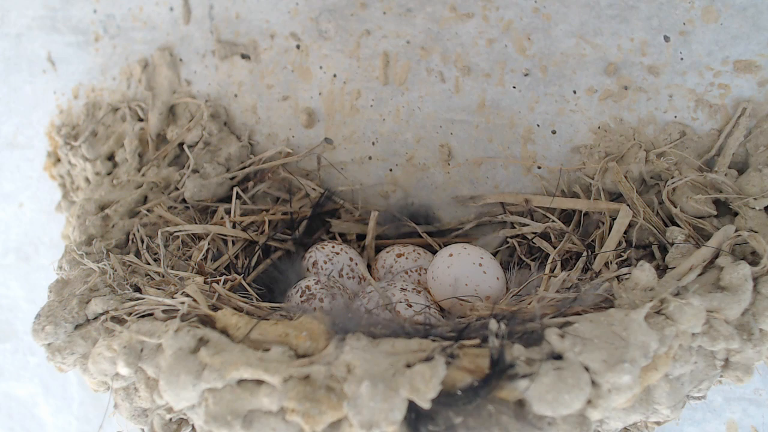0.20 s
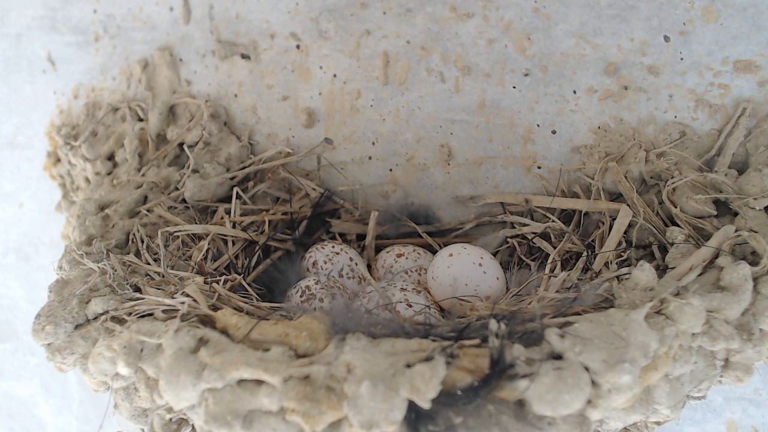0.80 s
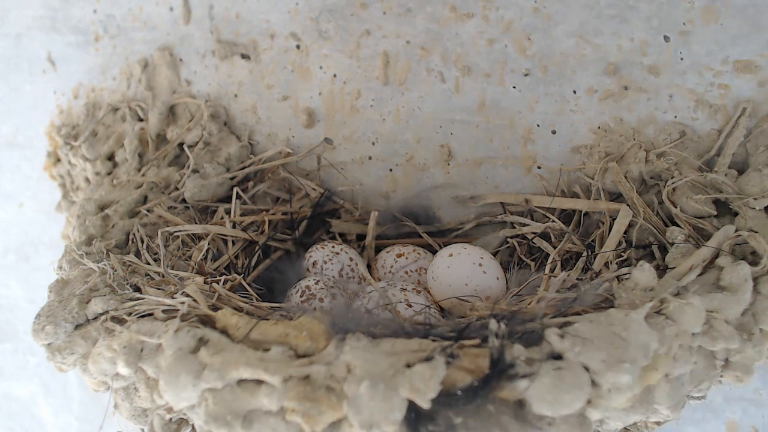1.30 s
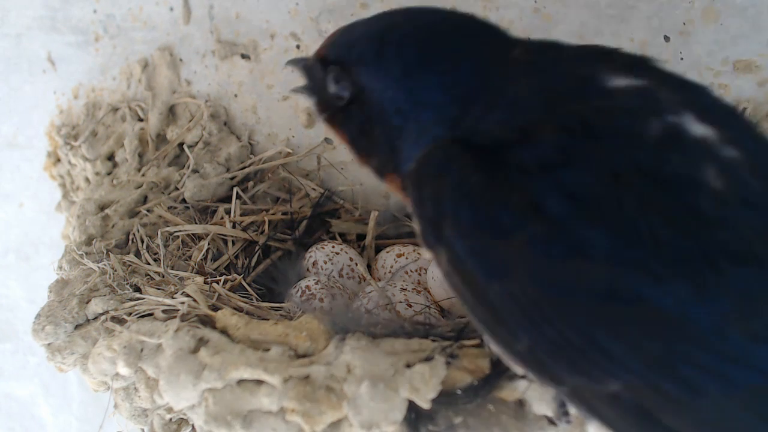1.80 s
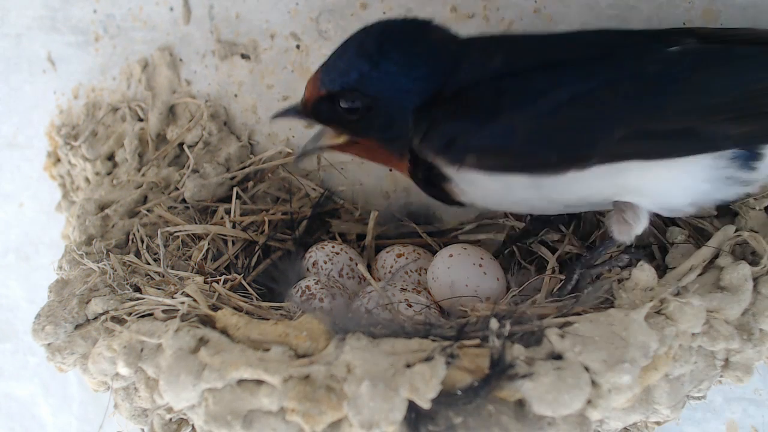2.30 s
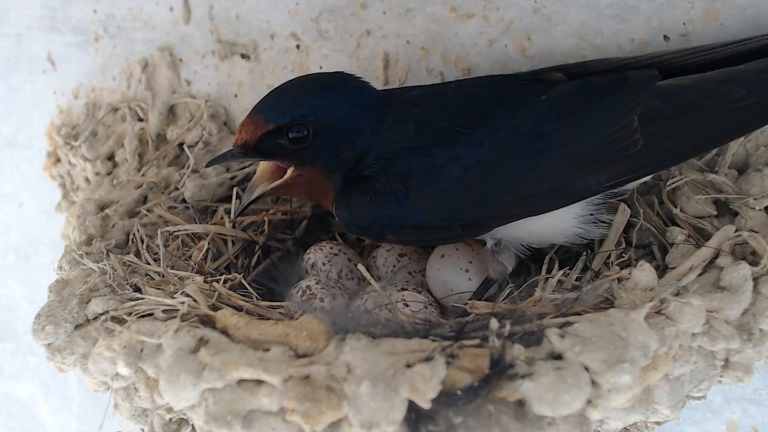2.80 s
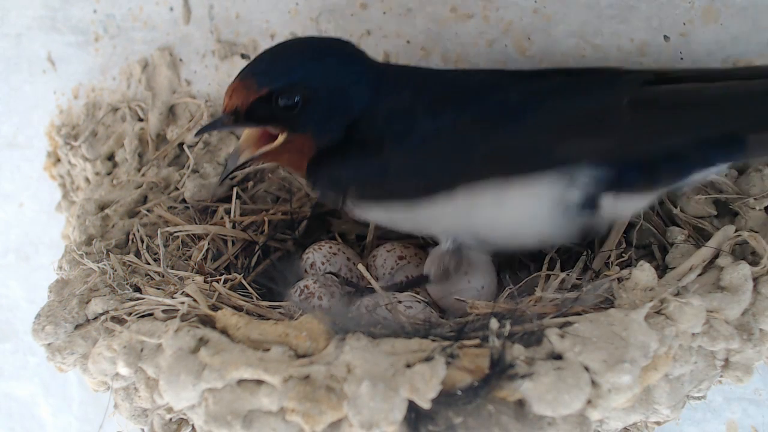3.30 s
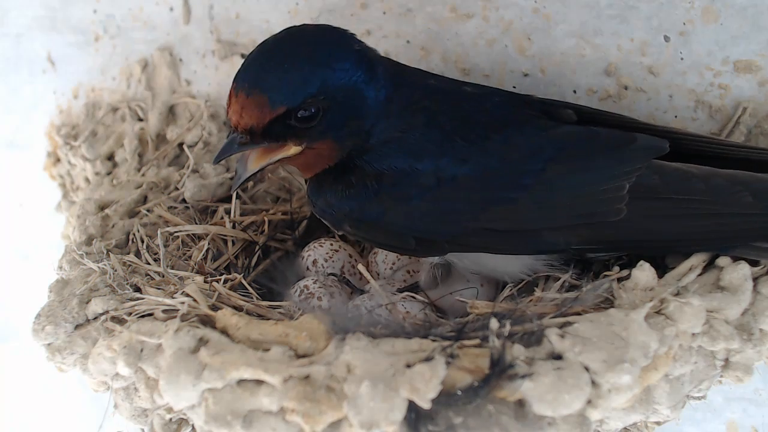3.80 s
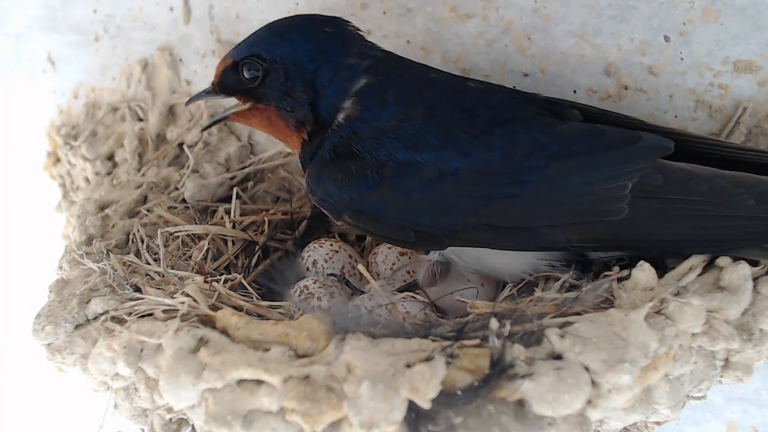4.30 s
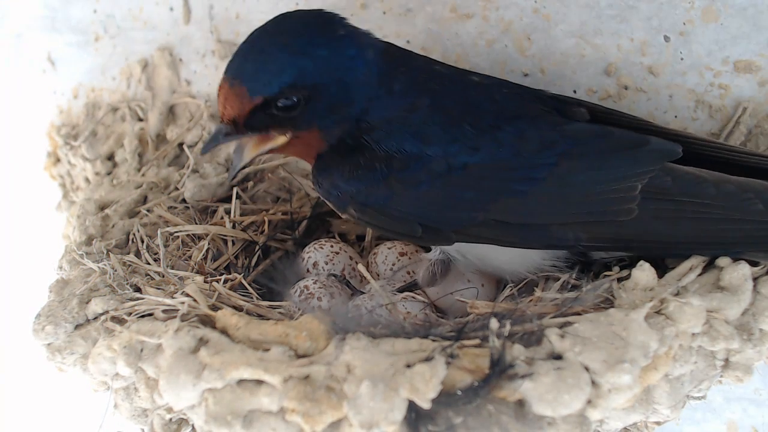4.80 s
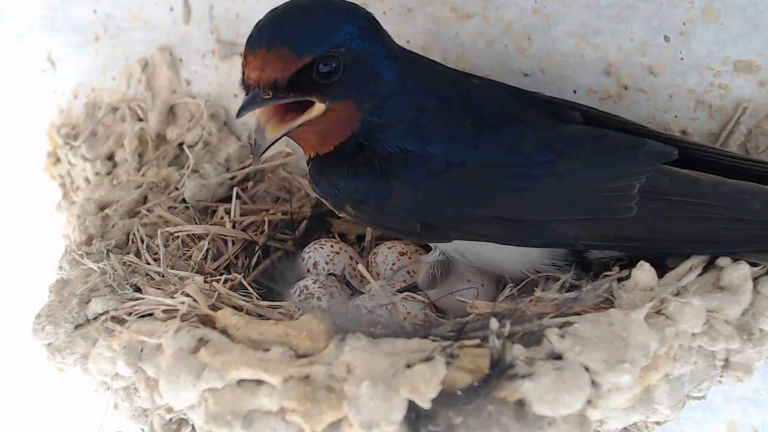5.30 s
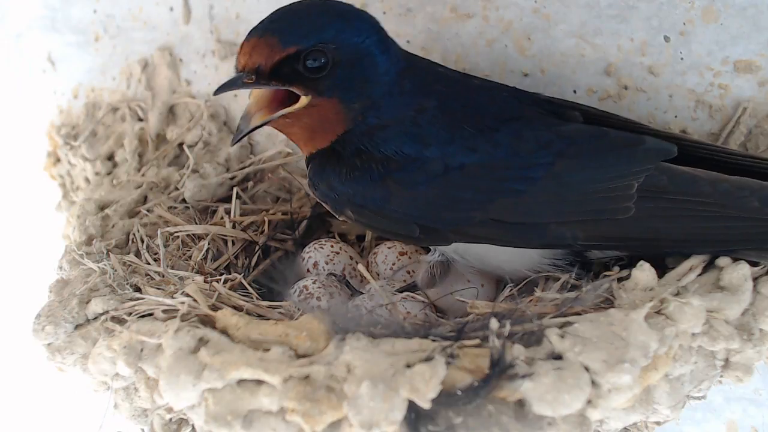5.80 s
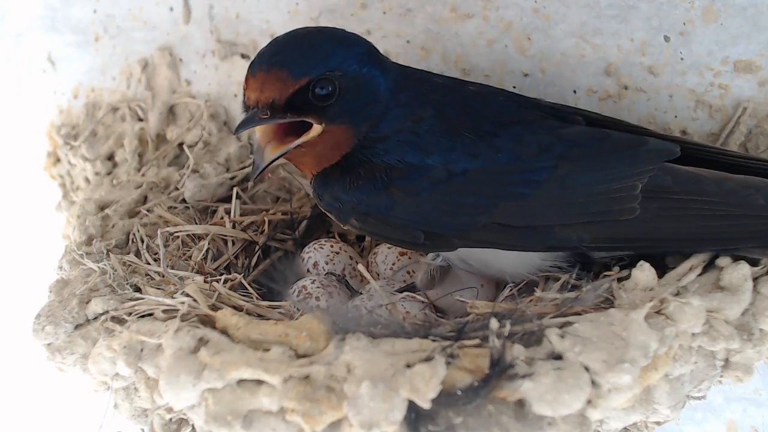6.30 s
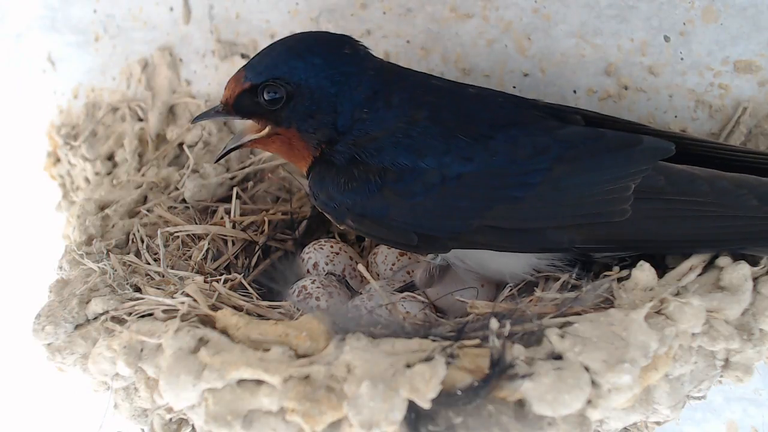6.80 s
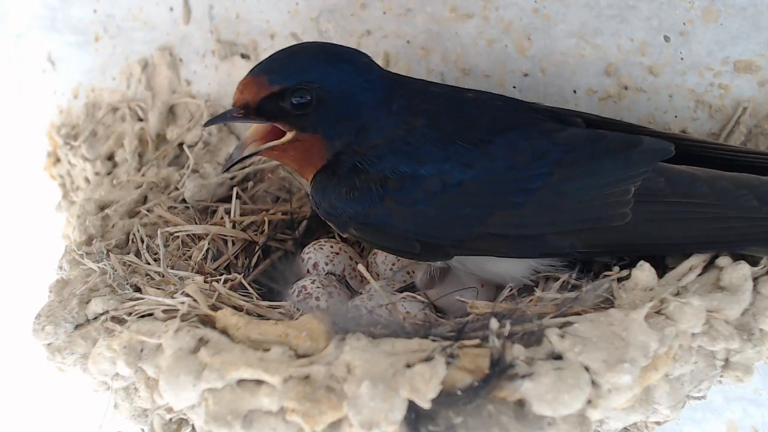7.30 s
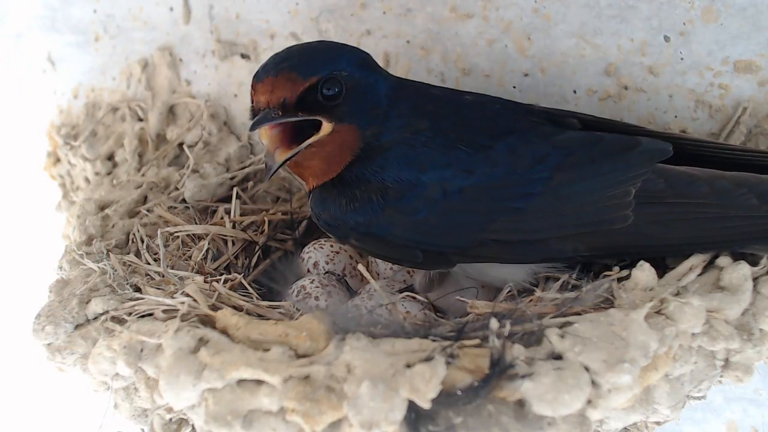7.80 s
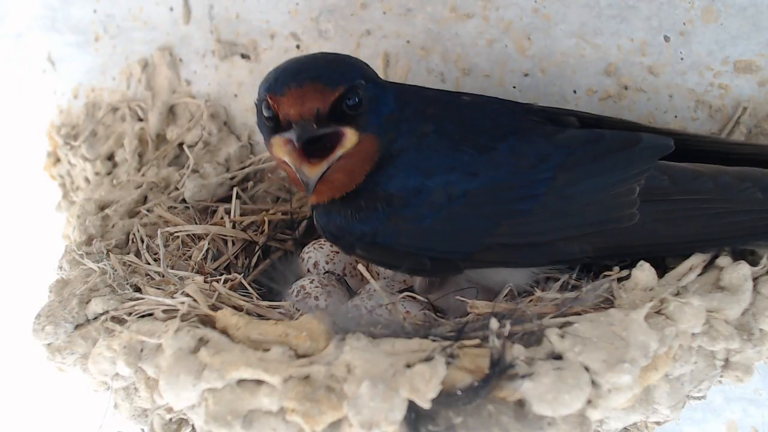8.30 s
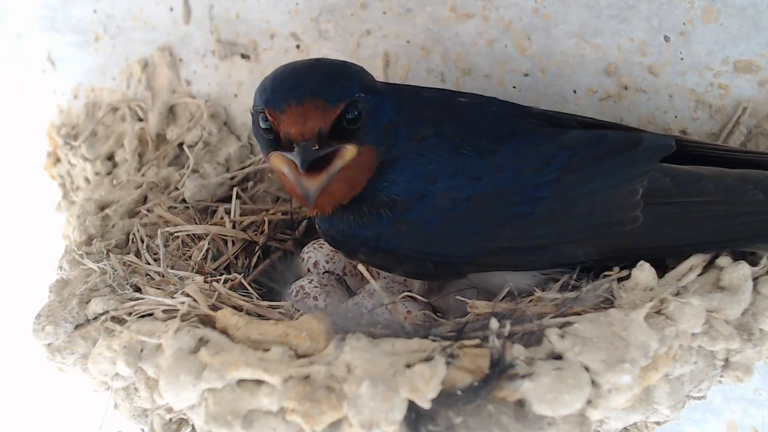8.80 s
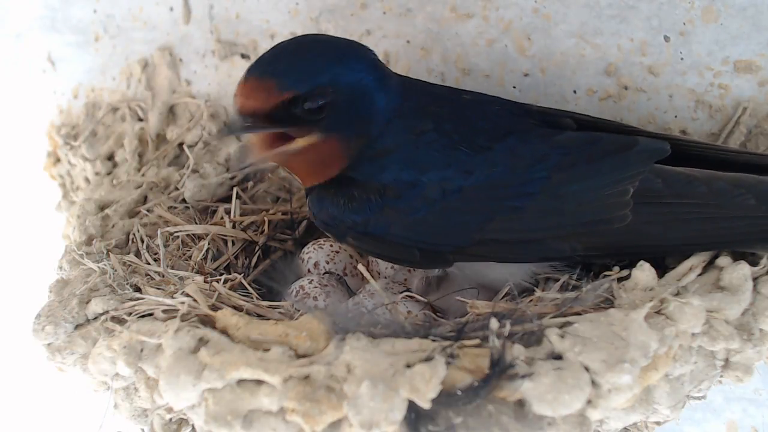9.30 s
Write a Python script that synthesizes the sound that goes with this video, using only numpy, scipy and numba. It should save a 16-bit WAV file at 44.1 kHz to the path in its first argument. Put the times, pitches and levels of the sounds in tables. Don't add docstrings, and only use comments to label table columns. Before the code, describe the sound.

Quiet outdoor hush and slight wind rumble beside an open shed. From 0 to 1 s a swallow flying in gives small, quick chirps and scratchy notes, faint, echoing and left of the microphone. Wingbeats begin softly around 0.7 s, and from 1.05 to 1.7 s become low buffeting thumps with feather rustle and sharp taps. It lands near 1.7 s with short rasps and rising whistles, a bright one at 2.1 s. A long hoarse, crackling buzz around 4 kHz swells until 3 s, with light foot taps around 2.3-2.6 s. More rasps follow at 3.1, 3.8, 4.35 and 5.1 s, then long ones at 5.6-6.5, 6.6-7.4 and 7.5-7.9 s, each starting softly and cutting off, often with a tiny whistled hook. From 8 s calls shorten; between 8.5 and 9.1 s four loud rasps burst into piercing two-toned whistles. A final whistle-laced rasp runs 9.25-9.5 s.

```python
import sys
import numpy as np
from scipy import signal
from scipy.io import wavfile
from scipy.ndimage import uniform_filter1d, minimum_filter1d
from numba import njit

SR = 44100
rng = np.random.default_rng(int(sys.argv[2]) if len(sys.argv) > 2 else 0)


def transcribe(u):
    v = np.clip(np.atleast_2d(u).T, -1, 1)
    q = np.round(v * 32767).astype(np.int16)
    wavfile.write(sys.argv[1], SR, q)


def nominal_scale(level):
    x = np.asarray(level, float) / 20
    return 10 ** x


N = 420713
T = np.arange(N) / SR


@njit
def svf(x, hz, width):
    y, b, l = np.empty(len(x)), 0., 0.
    for i in range(len(x)):
        g, k = np.tan(np.pi * hz[i] / SR), width[i] / hz[i]
        v = (b + g * (x[i] - l)) / (1 + g * (g + k))
        b, l, y[i] = 2 * v - b, l + 2 * g * v, k * v
    return y


def band(x, hz, width_hz):
    hz, width_hz = hz + 0 * T, width_hz + 0 * T
    return svf(svf(x, hz, width_hz), hz, width_hz) * np.sqrt(SR / (np.pi / 2 * width_hz))


def walk(rate_hz):
    k = int(SR / rate_hz)
    steps = np.repeat(rng.standard_normal(N // k + 1), k)
    return uniform_filter1d(uniform_filter1d(steps, k), k)[:N]


def curve(table):
    s, *columns = np.transpose(table)
    return [np.interp(T, s, c) for c in columns]


# pitch_hz, level_db (per Hz)
HUSH = [(100, -13), (335, -31.5), (571, -28.5), (1430, -20.5), (2810, -40.5), (3570, -20.5), (3990, -22.5),
        (8000, -35)]
HUSH_DB = -61
# time_s, level_db
WIND_ON_PORTS = [(0.0, -77), (0.58, -72.5), (1.3, -54), (1.56, -65.5), (1.7, -81.5), (1.94, -76.5),
                 (2.34, -67), (3.61, -81.5), (5.79, -81.5), (6.56, -78.5), (6.96, -67.5), (7.33, -78.5),
                 (8.23, -79), (8.42, -70.5), (9.54, -72.5)]


def air():
    hush = np.zeros((2, N))
    hush_hz, hush_db = np.transpose(HUSH)
    for hz in 110 * 2 ** np.arange(0, 6.2, .5):
        db = np.interp(np.log(hz), np.log(hush_hz), hush_db) + 10 * np.log10(hz / 1000) + HUSH_DB
        db = db + 5 * (T > .45) * (T < 1.7) * (500 < hz < 2600)
        db = db + 3 * walk(6)
        hush += nominal_scale(db) * np.array([band(rng.standard_normal(N), hz, hz / 2) for _ in range(2)])
    common = .6 * band(rng.standard_normal(N), 33, 110)
    rumble = np.array([common + .8 * band(rng.standard_normal(N), 41, 99) for _ in range(2)])
    wind_db, = curve(WIND_ON_PORTS)
    return hush + rumble * nominal_scale(wind_db + 10.5 + 2.1 * walk(21))


SHED_T60_S, SHED_DB, FLIGHT_WET_DB = 0.6, -24, 18


def shed(x):
    u = np.arange(int(SHED_T60_S * SR)) / SR
    tail = rng.standard_normal((2, len(u))) * np.exp(-np.log(1000) * u / SHED_T60_S) * (u > .002)
    tail = tail * (1 + 3 * np.exp(-u / 0.0061))
    tail = tail / np.sqrt(np.sum(tail ** 2, axis=1, keepdims=True))
    return signal.fftconvolve(x[None], tail, axes=1)[:, :N]


# time_s, gust_db
WINGBEATS = [(0.69, -46), (0.75, -41.5), (0.812, -47), (0.887, -65), (0.928, -43), (0.968, -42),
             (1.009, -66), (1.05, -31.5), (1.118, -20.5), (1.2, -24.5), (1.256, -18.5), (1.311, -20),
             (1.379, -27), (1.429, -25.5), (1.48, -21.5), (1.544, -32.5), (1.595, -31.5), (1.654, -29),
             (1.714, -40)]
GUST_HZ, SLOWER_HZ_PER_DB = 89, 4
RUSTLE_DB, HOVER_S, HOVER_RUSTLE_DB, PUFF_S = -29, 1.23, -39, .011
# start_s, peak_db, ring_hz, t60_s, left_minus_right_db
TOUCHES = [(1.1056, -25, 1220, 0.0078, -1), (1.1218, -23, 2310, 0.0014, 28.5), (1.197, -29, 437, 0.041, 12),
           (1.33, -54, 1740, 0.02, 4), (1.393, -49, 1620, 0.0097, 7), (2.3, -42, 1310, 0.029, 7),
           (2.469, -44, 1960, 0.018, 9), (2.559, -46, 1900, 0.018, 4), (2.352, -37, 980, 0.0059, 5),
           (6.49, -37.5, 1450, 0.0063, 11), (7.38, -48.5, 1560, 0.013, 18), (6.49, -46, 140, .04, 9),
           (8.3, -44, 190, 0.052, 8), (3.625, -52, 90, 0.066, 2)]


def wings():
    out = np.zeros((2, N))
    chance = rng.standard_normal((len(WINGBEATS), 2, 3))
    sparks_db = 4.5 * rng.exponential(size=(2, N)) * (rng.random((2, N)) < .02)
    crackle = rng.standard_normal((2, N)) * nominal_scale(sparks_db)
    rustle = np.array([band(c / np.std(c), 240, 890) for c in crackle])
    for (s, db), ports in zip(WINGBEATS, chance):
        hz = GUST_HZ - SLOWER_HZ_PER_DB * max(db + 31.0, 0)
        rustle_db = db + (RUSTLE_DB if s < HOVER_S else HOVER_RUSTLE_DB)
        span = slice(int((s - .05) * SR), int((s + 0.032) * SR))
        puff = nominal_scale(rustle_db + 12.5) * np.exp(-((T[span] - s) / PUFF_S) ** 2)
        for ch, (late, skew, size) in enumerate(ports):
            u = (T[span] - s - 0.0021 * late) * hz
            gust = -np.exp(-(u / 0.19) ** 2) * np.cos(1.7 * np.pi * u + 0.43 * skew)
            wake = 0.096 * np.exp(-((u - 1.1) / 0.78) ** 2)
            out[ch, span] += nominal_scale(db + 3.04 * size) * (gust + wake)
            out[ch, span] += puff * rustle[ch, span]
    for s, db, hz, t60, pan_db in TOUCHES:
        u = np.arange(int(t60 * SR)) / SR
        ring = np.sin(2 * np.pi * hz * u) + 0.09 * rng.standard_normal(len(u)) * (hz > 1000)
        ring = ring * np.exp(-np.log(1000) * (u / t60) ** 1.25) * np.minimum(u * hz, 1)
        start = int(s * SR)
        out[:, start:start + len(u)] += nominal_scale(db + np.array([[pan_db], [-pan_db]]) / 2) * ring
    return out


# start_s, end_s, level_db after the attack, end_level_db, tension_db of the throat
NEST_RASPS = [(1.635, 1.696, -48, -51, -1), (1.697, 1.738, -55, -66, 1), (1.7435, 1.942, -49, -40, 1.5),
              (2.0295, 2.053, -44, -54, 0.5), (2.0545, 3.012, -39, -36, 3.5), (3.104, 3.642, -41.5, -34, 3),
              (3.762, 4.146, -39.5, -35.5, 2), (4.2555, 4.2575, -52, -52, 4), (4.268, 4.284, -49, -51, 3.5),
              (4.285, 4.304, -58, -56, 6), (4.352, 4.613, -37.5, -36, 9), (4.72, 4.843, -41, -40.5, 3.5),
              (4.9865, 5.064, -45.5, -46, -1), (5.083, 5.494, -40.5, -33.5, 0.5),
              (5.595, 6.499, -37.5, -35, 1.5), (6.609, 7.39, -38, -32.5, 8),
              (7.495, 7.942, -37.5, -32, 1.5), (8.055, 8.288, -35.5, -35, -0.5),
              (8.344, 8.469, -33.5, -36.5, 1.5), (8.53, 8.651, -28.5, -36.5, 2),
              (8.7145, 8.828, -25, -36, 4.5), (8.885, 8.974, -29, -48.5, 2),
              (9.028, 9.128, -25, -45.5, 9.5), (9.237, 9.514, -33, -33, 1.5)]
ONSET_DB, ATTACK_S, SHORT_ATTACK, LANDING_ONSET_DB = -49.5, 0.099, 0.75, -2
EAGER, RESUMES_S = 0.41, 5.088
PUSH_S, PUSH_DB = 0.053, 1.5
THROAT_HZ, TENSE_HZ_PER_DB, CLIMB_HZ, LANDING_SLACK_HZ = 3889, 50, 150, 895
BEAK_DB, BEAK_PER_DB, GAPE_DB = -3.5, -1.02, 1
PIPE_DB, PIPE_PER_DB, LOOSE_DB, LANDING_DB = -3, -0.0942, 1, 7


def calls():
    out = []
    for a, b, held_db, end_db, tense in NEST_RASPS:
        hz = THROAT_HZ + TENSE_HZ_PER_DB * tense - LANDING_SLACK_HZ * (a < 1.7)
        beak_db = BEAK_DB + BEAK_PER_DB * tense
        pipe_db = PIPE_DB + PIPE_PER_DB * tense + LANDING_DB * (a < 2) + 4 * (a < 1.7)
        attack_s = min(ATTACK_S, SHORT_ATTACK * (b - a))
        onset_db = min(ONSET_DB + EAGER * (held_db + 36.0) + LANDING_ONSET_DB * (a < 2), held_db)
        if abs(a - RESUMES_S) < .03:
            onset_db = held_db - 3
        rows = [(a, onset_db, min((THROAT_HZ + hz) / 2, hz), beak_db, pipe_db + LOOSE_DB),
                (a + attack_s, held_db, hz, beak_db, pipe_db)]
        if b - a > 2 * ATTACK_S:
            rows.append((b - PUSH_S, end_db - PUSH_DB, hz + CLIMB_HZ, beak_db, pipe_db))
        out.append(rows + [(b, end_db, hz + CLIMB_HZ, beak_db + GAPE_DB, pipe_db + GAPE_DB / 2)])
    return out


def effort(calls):
    gain = np.zeros(N)
    for c in calls:
        s, db = np.transpose(c)[:2]
        gain += np.where((T > s[0]) & (T < s[-1]), nominal_scale(np.interp(T, s, db)), 0)
    return uniform_filter1d(gain, size=30)


BURST_S, BURST_FADE_S, BURST_DEPTH, START_DEPTH, START_S, HELD_DEPTH = .0032, .0026, .15, .65, .07, .3


def bursts():
    chance = rng.random((int(2.1 * T[-1] / BURST_S), 2))
    opens = np.cumsum(BURST_S * (.5 + chance[:, 0])) - 1.5 * BURST_S
    k = np.searchsorted(opens, T) - 1
    size = .6 + .8 * chance[k, 1]
    snap = size * np.exp(-(T - opens[k]) / BURST_FADE_S)
    swell = size * np.exp(-(opens[k + 1] - T) / BURST_FADE_S)
    starts = np.array([0] + [r[0] for r in NEST_RASPS])
    early = np.exp(-(T - starts[np.searchsorted(starts, T, "right") - 1]) / START_S)
    fresh, held = (BURST_DEPTH + START_DEPTH) * early, HELD_DEPTH * (1 - early)
    flaps = (fresh * snap + held * swell) / np.sqrt(np.mean(snap ** 2))
    return uniform_filter1d(1 - fresh - held + flaps, size=10)


# start_s, end_s, level_db
FLIGHT_RASPS = [(0.013, 0.05, -74), (0.118, 0.153, -76), (0.158, 0.178, -69.5), (0.243, 0.261, -75),
                (0.291, 0.324, -67), (0.369, 0.407, -70.5), (0.42, 0.436, -63.5), (0.518, 0.577, -65),
                (0.637, 0.716, -69.5), (0.742, 0.848, -64.5), (0.899, 0.96, -63), (1.286, 1.342, -71),
                (1.363, 1.403, -69), (1.465, 1.484, -65.5)]
# time_s, pitch_hz, level_db against the broad ring
THROAT_RIDGE = [(2.05, 4190, -18), (2.2, 4226, -8), (2.5, 4600, -12), (3.0, 4430, -6), (3.2, 4400, -4.5),
                (3.6, 4630, -10.5), (3.9, 4310, -11.5), (4.352, 3900, -11), (4.41, 4600, -1.5),
                (4.5, 4640, -2), (5.2, 4400, -21.5), (5.9, 4440, -14), (6.45, 4420, -18), (6.72, 4620, -2),
                (7.15, 4780, -9), (7.4, 4470, -10), (9.3, 4300, -18.5), (9.45, 4610, -12)]
UPPER_HZ, UPPER_DB = 5320, -15
# time_s, pitch_hz
RIDGE_PATHS = [
    [(2.13, 4170), (2.454, 4450), (3.0, 4400)],
    [(3.23, 4420), (3.454, 4580), (3.53, 4340), (3.63, 4660)],
    [(3.82, 4270), (3.904, 4360), (4.14, 4340)],
    [(5.1, 3940), (5.164, 4200), (5.378, 3930), (5.49, 4360)],
    [(5.65, 4240), (5.904, 4370), (6.054, 4270), (6.49, 4390)],
    [(6.68, 4550), (6.758, 4620), (7.152, 4600), (7.38, 4430)],
    [(7.58, 4300), (7.688, 4320), (7.886, 4220), (7.93, 4420)],
    [(8.07, 4210), (8.28, 4285)],
]
# time_s, pitch_hz
BEAK_RING = [(1.7, 5910), (2.5, 6500), (3.5, 6390), (4.5, 6260), (5.3, 6000), (6.2, 6250), (7, 6090),
             (8.2, 6230), (9.4, 5990)]
# start_s, length_ms
STICKS = [(3.142, 2.5), (3.1512, 3), (3.158, .8), (3.1628, 2.9), (3.778, 1.4), (3.7921, 2.7), (3.7989, .9),
          (3.8043, 2), (3.8166, .9), (4.7476, 2), (4.7689, 3.4), (4.7751, 1.1), (4.7853, 1.1),
          (4.7966, 3.4), (4.9927, 1.6), (5.0218, 1.4), (5.6202, 1.4), (5.6279, 1.4), (5.6327, .9),
          (5.6415, 1.4), (6.615, 1), (6.6222, 1), (6.629, 4.3), (6.6428, 1.2), (6.6478, 4), (6.6599, .9),
          (6.6678, 1.4), (7.514, 1.2), (7.5311, 2.9), (7.553, 1), (7.566, 1), (8.0704, 1.6), (3.1265, 1),
          (3.1375, 1), (4.8018, 1.2), (4.8052, 1.5), (7.5055, .8), (7.522, 1), (7.541, .9), (7.559, 1),
          (4.3855, 2), (4.402, 1.5), (4.416, 1), (4.4195, .7), (4.4225, .8), (4.427, .8), (4.442, 1.8),
          (4.448, 1.2), (4.457, .8)]
SAG_S, SAG_DB, SAG_WIDTH_S = 2.48, -3, 0.11


def rasp(low_size, high_size):
    nest = calls()
    s, _, *columns = np.transpose([r for c in nest for r in c])
    throat_hz, beak_db, pipe_db = (np.interp(T, s, c) for c in columns)
    gain = effort(nest) + effort([[(a, db - 1), (b, db)] for a, b, db in FLIGHT_RASPS])
    slaps = (rng.random(N) < 9000 / SR) * np.sign(rng.standard_normal(N)) * nominal_scale(1.5 * walk(500))
    slaps = slaps / np.sqrt(np.mean(slaps ** 2))

    width_hz = np.clip(1554.5 + 75 * pipe_db, 400, 2000)
    throat_hz = throat_hz * (1 + .012 * walk(60))
    swing = np.tanh(.6 * band(slaps, throat_hz, width_hz))
    throat = 1.91 * svf(swing, throat_hz, 3 * width_hz) * nominal_scale(0.85 * walk(170))

    ridge_hz, ridge_db = curve(THROAT_RIDGE)
    for path in RIDGE_PATHS:
        s, hz = np.transpose(path)
        ridge_hz = np.where((T > s[0]) & (T < s[-1]), np.interp(T, s, hz), ridge_hz)
    unsteady_hz = uniform_filter1d(ridge_hz, size=400) * (1 + .014 * walk(25) + .025 * walk(90))
    ridge = np.tanh(.8 * band(slaps, unsteady_hz, 400))
    ridge = 2 * svf(ridge, ridge_hz, 900 + 0 * T) * nominal_scale(2 * walk(200))
    ridge = ridge + nominal_scale(UPPER_DB) * band(slaps, UPPER_HZ, 240)
    throat = throat + nominal_scale(ridge_db) * ridge

    pipe = band(slaps, 3580, 1100) + nominal_scale(-2.0) * band(slaps, 3215, 1400)
    beak_hz, = curve(BEAK_RING)
    beak = band(slaps, beak_hz * (1 + 0.036 * walk(8)), 1000) + nominal_scale(-14.0) * band(slaps, 7800, 5300)

    low_share, high_share = low_size / (gain + 1e-9), high_size / (gain + 1e-9)
    throat = throat / (1 + (.8 * high_share) ** 2)
    pipe = pipe / (1 + (.7 * low_share) ** 2)
    beak = beak / (1 + (.5 * high_share) ** 2 * (T > 8.5))

    beak_out_db = beak_db + 2.0 - 0.61 * (T < 1.5) - 3 * (np.abs(T - 2.72) < .25)
    voice = throat + nominal_scale(pipe_db - 11.0) * pipe + nominal_scale(beak_out_db) * beak
    chest = nominal_scale(-21.5) * band(slaps, 942, 1950) + nominal_scale(-28.5) * band(slaps, 312, 710)
    voice = voice + chest

    side_depth = np.clip(-.06 * pipe_db - .2, 0, .6)
    beak_part = np.clip(-.06 * (beak_db + 8), 0, .35)
    broad_depth = np.clip(-.11 * pipe_db + beak_part, .1, .9)
    for hz, notch_hz, depth in [(5020, 260, .65), (5600, 350, side_depth), (2200, 1000, broad_depth)]:
        voice = voice - depth * svf(voice, hz + 0 * T, notch_hz + 0 * T)

    shut = np.ones(N)
    for s, ms in STICKS:
        shut[int((s - .0004) * SR):int((s + ms / 1000 + .0002) * SR)] = nominal_scale(-24)
    head_dip = nominal_scale(SAG_DB * np.exp(-((T - SAG_S) / SAG_WIDTH_S) ** 2))
    return voice * uniform_filter1d(shut, size=16) * gain * bursts() * head_dip


LOCK_DB = -1


def whistle(notes, locks, wobble, sag):
    s = np.array([a + u * (b - a) for a, b, *_ in notes for u in (.1, .5, .88)])
    pitches = np.array([n[2:5] for n in notes]).ravel()
    order = np.argsort(s)
    hz = np.interp(T, s[order], pitches[order])
    size, slack = np.zeros(N), np.ones(N)
    for a, b, *_, db in notes:
        span = slice(int(a * SR), int(b * SR))
        u = (T[span] - a) / (b - a)
        swell_db = np.interp(u, [0, .12, .7, .9, 1], [-30.0, -4.5, -4.0, -17.5, -18.5])
        size[span] = np.maximum(size[span], nominal_scale(db + swell_db))
        slack[span] = np.minimum(slack[span], np.clip(1 - (b - T[span]) / .006, 0, 1))
    size = minimum_filter1d(-minimum_filter1d(-size, size=350), size=350)
    hz = uniform_filter1d(hz, size=150) * (1 - sag * uniform_filter1d(slack, size=60))
    loose = np.ones(N)
    for lock in locks:
        s, lock_hz, db = np.transpose(lock)
        span = slice(int(s[0] * SR), int(s[-1] * SR))
        hz[span] = np.interp(T[span], s, lock_hz)
        size[span] = nominal_scale(np.interp(T[span], s, db) + LOCK_DB)
        loose[span] = .3
    hz = uniform_filter1d(hz, size=90) * (1 + wobble * loose * walk(400))
    size = np.abs(uniform_filter1d(size, size=70))
    phase = 2 * np.pi * np.cumsum(hz) / SR
    return phase, np.sqrt(2) * size * nominal_scale(2.2 * np.sqrt(loose) * walk(250))


def whistle_notes(arched, first, last, glides):
    arches = [(s, s + d, hz * first, hz, hz * last, db) for s, d, hz, db in arched]
    return arches + [(s, s + d, a, (a + b) / 2, b, db) for s, d, a, b, db in glides]


# start_s, length_s, top_hz, level_db
LOW_ARCHES = [(.035, 0.017, 3670, -54), (.175, 0.017, 3610, -58.5), (.3, 0.031, 3650, -52.5),
              (.42, 0.01428, 3690, -51), (.44, 0.012, 3630, -46.5), (.562, 0.017, 3520, -49),
              (.691, 0.016, 3430, -51), (.776, 0.022, 3800, -51), (.824, 0.023, 3550, -51),
              (.958, 0.043, 3560, -48.5), (1.295, 0.031, 3260, -60), (1.33, 0.017, 3380, -53),
              (1.372, 0.019, 3294, -52), (1.557, 0.0269, 2692, -48.5), (.003, 0.015, 3850, -64),
              (.012, .012, 3050, -66), (.022, .014, 3780, -60), (.138, 0.017, 3080, -69),
              (.158, .014, 3280, -60)]
HIGH_ARCHES = [
    (.118, 0.019, 4170, -60),
    (.245, 0.0213, 4280, -50.5),
    (.37, 0.049, 4220, -53),
    (.517, 0.018, 4180, -52),
    (.745, 0.02, 3800, -56),
    (.801, 0.022, 3950, -51),
    (.955, 0.026, 4500, -59),
    (1.295, 0.045, 4880, -58.5),
    (1.372, 0.036, 4800, -59.5),
]
# start_s, length_s, first_hz, last_hz, level_db
LOW_GLIDES = [
    (5.056, 0.03, 3413, 3170, -46.5),
    (6.505, 0.019, 3128, 3570, -48),
    (8.153, .14, 3550, 3357, -41),
    (8.905, .022, 3700, 3900, -52),
]
HIGH_GLIDES = [(1.692, .02, 2970, 3502, -40), (1.712, .022, 4170, 4900, -54),
               (6.508, .017, 4500, 4850, -51), (8.445, .026, 5020, 5550, -40.5),
               (2.17, 0.03, 3800, 4400, -42), (.898, .045, 3850, 4150, -47), (8.538, .018, 3900, 4750, -43),
               (9.395, .06, 4700, 4850, -42), (9.465, .045, 4500, 5100, -39),
               (8.714, .009, 3500, 4900, -42), (8.723, .028, 4900, 4800, -43),
               (2.093, .025, 5000, 5500, -48)]
# start_s, level_db
FALLING_OPENERS = [
    (8.348, -41),
]
# end_s, pitch_hz, level_db
CLOSING_HOOKS = [(3.015, 3590, -35.5), (3.645, 3450, -36), (4.149, 3465, -38.5), (4.617, 3272, -48.5),
                 (4.846, 3524, -36.5), (5.498, 3505, -34.5), (6.498, 3237, -38), (7.391, 3290, -31),
                 (7.945, 3280, -42), (8.289, 3320, -41), (9.518, 3520, -40)]
HOOK_S, HOOK_FALL, OPENER_S = 0.016, 0.98, 0.022
# time_s, pitch_hz, level_db
UPPER_LOCKS = [
    [(1.745, 3082, -56), (1.767, 3634, -51), (1.783, 4020, -44), (1.791, 4269, -40), (1.797, 4700, -56),
     (1.803, 5087, -53)],
    [(1.865, 3450, -50), (1.887, 4039, -43), (1.909, 4204, -42), (1.925, 4545, -44), (1.932, 4650, -54)],
    [(2.07, 2860, -56), (2.08, 3250, -51), (2.092, 3720, -35), (2.1, 3925, -40), (2.108, 4250, -40),
     (2.114, 4540, -33), (2.121, 4565, -37), (2.127, 4450, -52)],
    [(8.585, 4817, -48), (8.6, 4800, -40), (8.626, 4780, -30), (8.636, 4980, -32), (8.644, 5296, -40),
     (8.651, 5310, -58)],
    [(8.755, 4650, -45), (8.775, 4580, -33), (8.796, 4537, -25), (8.805, 4680, -25), (8.814, 4919, -27),
     (8.824, 5040, -35), (8.832, 4936, -48)],
    [(8.889, 4850, -55), (8.897, 5200, -42), (8.92, 5040, -41), (8.935, 5010, -35), (8.951, 4760, -27),
     (8.958, 4950, -33), (8.965, 5135, -37), (8.976, 5154, -55)],
    [(9.028, 3300, -48), (9.036, 3950, -34), (9.054, 4662, -27), (9.066, 4266, -33), (9.078, 4215, -34),
     (9.09, 4541, -25), (9.11, 4560, -24), (9.12, 4843, -33), (9.128, 4760, -56)],
]
# time_s, pitch_hz, level_db
LOWER_LOCKS = [
    [(1.68, 2115, -60), (1.7, 2560, -52), (1.709, 2720, -43), (1.715, 2790, -37), (1.719, 2760, -58)],
    [(1.752, 2512, -60), (1.77, 2434, -52), (1.779, 2600, -56), (1.789, 3000, -50), (1.797, 3300, -55)],
    [(1.893, 2528, -53), (1.905, 2842, -50), (1.929, 2900, -48), (1.939, 3170, -40), (1.944, 3150, -52)],
    [(2.078, 2170, -58), (2.09, 2330, -48), (2.097, 2500, -62), (2.104, 2870, -46), (2.111, 3150, -36),
     (2.118, 3370, -52)],
    [(4.257, 2850, -56), (4.262, 3050, -48), (4.27, 3200, -50), (4.277, 3250, -60), (4.284, 3330, -50),
     (4.292, 3500, -47), (4.299, 3350, -45), (4.304, 3020, -52)],
    [(8.44, 3355, -49), (8.454, 3328, -43), (8.462, 3552, -35), (8.468, 3700, -36), (8.473, 3606, -54)],
    [(8.595, 3450, -46), (8.614, 3400, -43), (8.623, 3268, -45), (8.634, 3309, -38), (8.646, 3640, -33),
     (8.65, 3680, -35), (8.654, 3400, -52)],
    [(8.79, 3525, -46), (8.804, 3344, -40), (8.816, 3591, -27), (8.824, 3800, -27), (8.828, 3700, -31),
     (8.832, 3380, -48)],
    [(8.93, 3230, -51), (8.942, 3450, -43), (8.958, 3580, -29), (8.97, 3960, -27), (8.975, 3850, -30),
     (8.98, 3480, -48)],
    [(9.095, 3450, -50), (9.105, 3515, -42), (9.115, 3562, -35), (9.124, 3790, -30), (9.128, 3720, -33),
     (9.132, 3400, -52)],
]
# time_s, pitch_hz, level_db
OPENING_LOCKS = [
    [(3.105, 4522, -45), (3.125, 4468, -41), (3.133, 4129, -47), (3.137, 4102, -46), (3.142, 4076, -59)],
    [(3.168, 4336, -57), (3.188, 4399, -46), (3.2, 4444, -57), (3.228, 4647, -51), (3.232, 4684, -55)],
    [(7.497, 4285, -56), (7.501, 4307, -43), (7.511, 4400, -39), (7.527, 4004, -49), (7.53, 3960, -62)],
    [(7.535, 4257, -47), (7.559, 4138, -44), (7.58, 4020, -48)],
    [(9.237, 4100, -50), (9.243, 4080, -43), (9.268, 3880, -45), (9.275, 3850, -54)],
    [(9.315, 4300, -46), (9.333, 4050, -37), (9.345, 4400, -36), (9.362, 4080, -36), (9.378, 4500, -34),
     (9.39, 4900, -44)],
]
HALO_DB, HALO_HZ = -9, 900


def bird():
    low = whistle_notes(LOW_ARCHES, 0.96, .93, LOW_GLIDES)
    low += [(s - HOOK_S, s, hz, hz, hz * HOOK_FALL, db) for s, hz, db in CLOSING_HOOKS]
    high = whistle_notes(HIGH_ARCHES, 0.98, 0.82, HIGH_GLIDES)
    high += [(s, s + OPENER_S, 4400, 4330, 4000, db) for s, db in FALLING_OPENERS]
    p, a = whistle(low, LOWER_LOCKS, wobble=.02, sag=.05)
    q, b = whistle(high, UPPER_LOCKS + OPENING_LOCKS, wobble=.026, sag=.02)
    octave_db = -0.5 - 30 * b / (a + b + 1e-9)
    octave_db = octave_db - 6.4 * (T < .9) - 4.3 * (T > 8.7) + 5.1 * (np.abs(T - 1.71) < .012)
    octave_khz = np.gradient(p) * SR / np.pi / 1000
    octave = nominal_scale(octave_db - 9.0 * np.clip(octave_khz - 6.7, 0, 2))
    flutter = 1 + nominal_scale(HALO_DB) * np.array([walk(HALO_HZ), walk(HALO_HZ)])
    lower = a * flutter[0] * (np.sin(p) + octave * np.sin(2 * p))
    upper = b * flutter[1] * np.sin(q)
    mixed = nominal_scale(-17) * np.sin(q - p) + nominal_scale(-23.0) * np.sin(2 * q - p) + nominal_scale(-30.0) * np.sin(2 * p - q)
    return lower + upper + np.sqrt(a * b) * mixed + rasp(a, b)


# time_s, left_minus_right_db
HEAD_TURN = [(0.0, 30), (0.82, 19), (1.11, 11), (1.43, 8), (2.76, 9.5), (4.12, 10), (4.54, 12.5), (5.08, 8),
             (7.17, 11), (8.85, 6), (9.14, 10), (9.54, 7.5)]
SCATTER_DB, SCATTER_S = -10.5, 0.005


def scene():
    song = bird()
    pan_db, = curve(HEAD_TURN)
    right = nominal_scale(-pan_db)
    shadow = (np.roll(song, 1) + np.roll(song, 2)) / 2 + 0.058 * np.roll(song, 18)
    shadow = shadow + .14 * np.roll(song, 130) - .06 * np.roll(song, 410)
    u = np.arange(800) / SR
    straw = rng.standard_normal(800) * np.exp(-u / SCATTER_S)
    scatter = signal.fftconvolve(song, straw / np.sqrt(np.sum(straw ** 2)))[:N]
    scatter = scatter + nominal_scale(7.0) * svf(scatter, 1200 + 0 * T, 1500 + 0 * T)
    shadow = shadow + nominal_scale(SCATTER_DB) * scatter
    direct = np.array([song, right * shadow]) / (.5 + 0.12 * right)
    echo = shed(song * nominal_scale(SHED_DB + FLIGHT_WET_DB * (T < 1.5))) * nominal_scale(np.array([[3.], [-3.]]))
    return direct + echo + wings() + air()


def low_pass(x):
    return signal.sosfilt(signal.butter(12, 8350, fs=SR, output="sos"), x)


def record(dry):
    x = np.tanh(1.5 * dry) / 1.5 + .02 * dry ** 2
    x = signal.sosfilt(signal.butter(3, 6600, fs=SR, output="sos"), x)
    x = signal.sosfilt(signal.butter(2, 22, "high", fs=SR, output="sos"), x)
    x = signal.sosfilt(signal.cheby1(9, .5, 7500, fs=SR, output="sos"), x)
    return low_pass(x)


dry = scene()
out = record(dry)
transcribe(out)
```